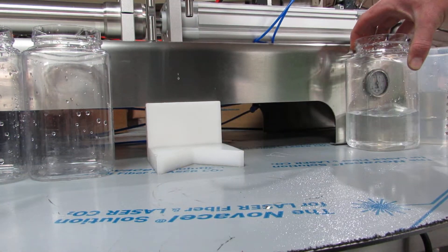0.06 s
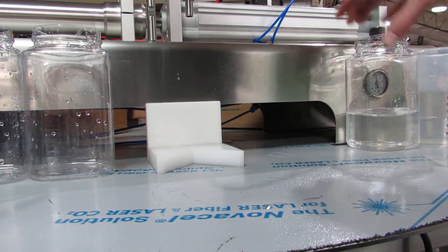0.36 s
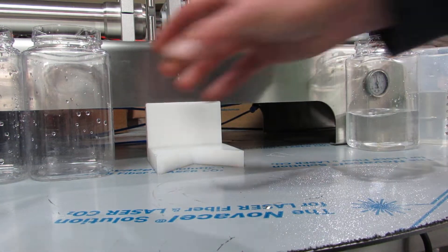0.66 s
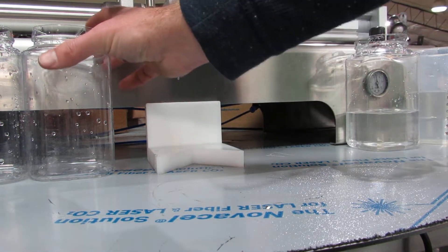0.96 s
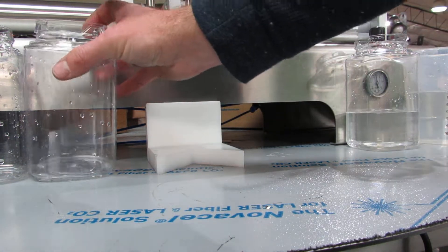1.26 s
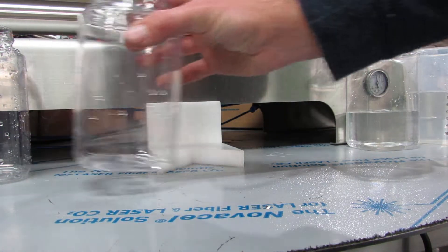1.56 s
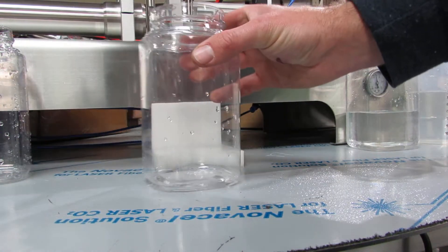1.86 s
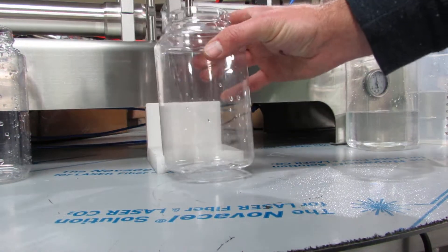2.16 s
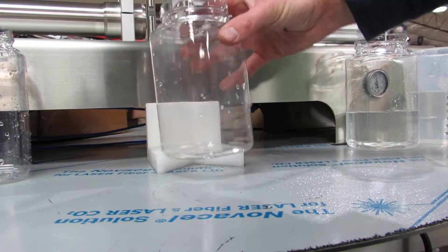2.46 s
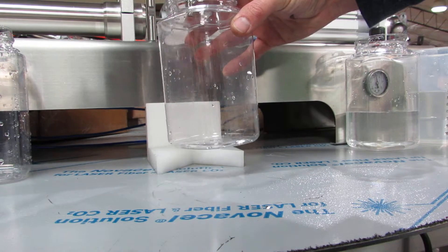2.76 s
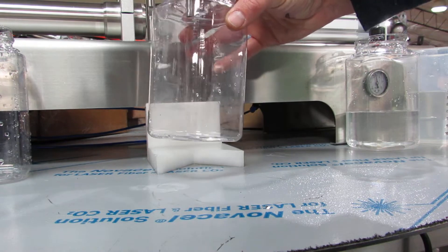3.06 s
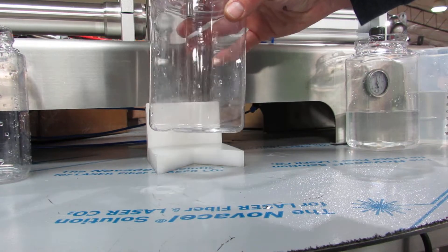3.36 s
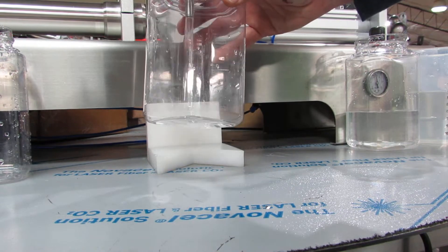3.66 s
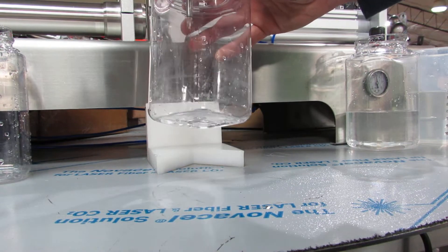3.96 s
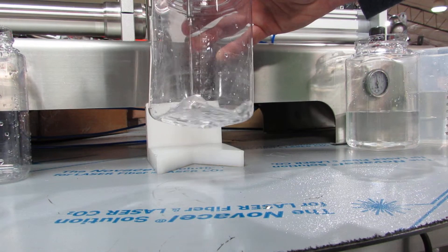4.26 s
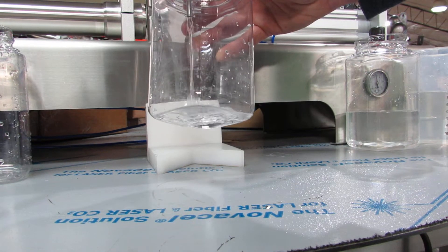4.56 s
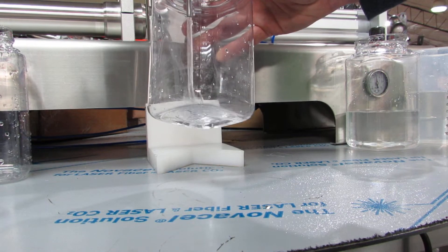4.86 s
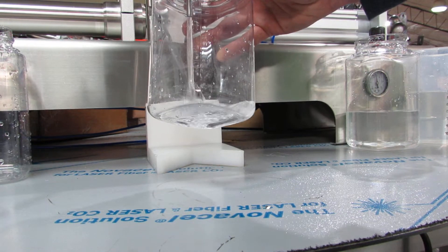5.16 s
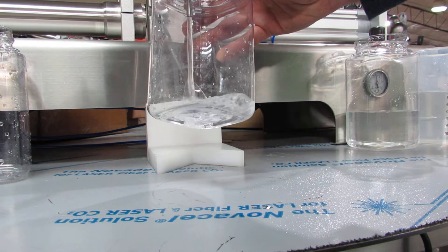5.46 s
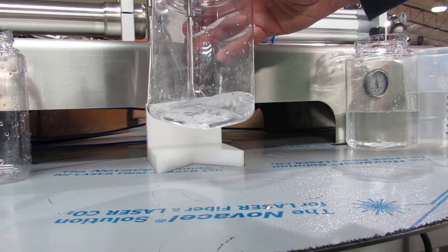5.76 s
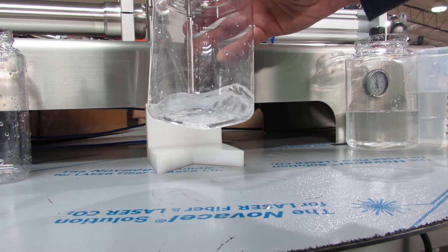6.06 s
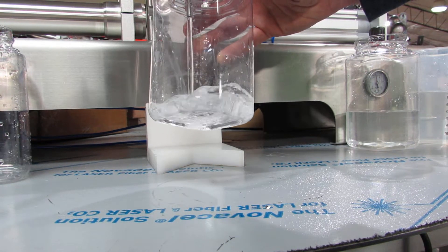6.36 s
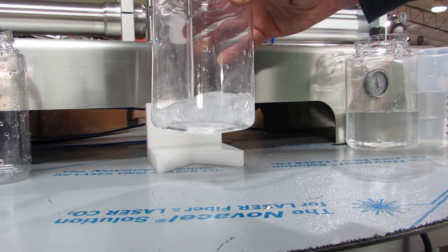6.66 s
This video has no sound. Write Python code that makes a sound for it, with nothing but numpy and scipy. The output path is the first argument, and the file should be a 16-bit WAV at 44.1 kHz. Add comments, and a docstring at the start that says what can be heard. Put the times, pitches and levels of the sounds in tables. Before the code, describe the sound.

Pneumatic hiss and hollow plastic knocks, then a sharp vent and thump as water drums and gurgles into a plastic jar.

```python
"""Air-driven piston filler in a workshop.

Air hisses through a throttle as the piston draws back; a hand knocks an empty plastic jar into place.
A valve vents, the nozzle bangs open and the piston pushes: water drums on the jar's bottom, then
splashes and gurgles in it. A second valve puffs half-way through the push. The room rumbles."""
import sys
import numpy as np
from scipy import signal
from scipy.fft import rfft, irfft
from scipy.io import wavfile

SR = 44100
rng = np.random.default_rng(int(sys.argv[2]) if len(sys.argv) > 2 else 0)


def waveform_to_disk(signal):
    """Save audio, clipped to [-1, 1], as 16-bit WAV at the path in sys.argv[1]."""
    frames = np.transpose(np.atleast_2d(signal))
    scaled = np.clip(frames, -1, 1) * 32767
    samples = np.round(scaled).astype(np.int16)
    wavfile.write(sys.argv[1], SR, samples)


N = 304290
TIME, FREQ = np.arange(N) / SR, np.arange(N // 2 + 1) * SR / N
JET_S = 3.42   # water reaches the jar

# left-right likeness of hiss and splash; the 2-3 kHz band sounds fully centred: freq_hz, correlation
HISS_LIKENESS = [(300, 0.88), (1200, 0.95), (2000, 1), (3000, 1), (3900, 0.99), (7500, 0.72), (10000, 0.75),
                 (14000, .66)]


def draw_hiss(gain_db=3):
    """Air whistles out through a throttle as the piston draws back; the jar moves in and shades it."""
    # turbulence: freq_hz, level_db
    spectrum = [(450, -12), (850, 0.5), (1300, -2.5), (1600, 7), (2250, -7.5), (2750, -7.5), (3600, -3),
                (5100, 1), (5900, -2.5), (7400, 0.5), (8400, -15.5), (9500, -9), (10500, -19.5),
                (15000, -20.5)]
    # throttle resonances: freq_hz, width_hz, gain_db
    peaks = [(1152, 45, 11), (1310, 45, 11), (1548, 14, 8), (1734, 12, 12), (2560, 5.9, 17),
             (2960, 28, 8.5), (3350, 31, 11.5), (3640, 14, 9), (4116, 10, 12), (7030, 70, 1)]
    hiss = air(spectrum, HISS_LIKENESS, peaks, ripple_db=2, ripple_hz=30) + from_db(-11) * whistle()
    flow = stroke(start_s=-.05, end_s=2.635, first_db=-39, steady_db=-45.7, settle_s=0.96)
    shading = from_db(-4 * ramp(start_s=1.7, length_s=0.057))
    return from_db(gain_db) * flow * shading * hiss


def push_hiss(gain_db=2.5):
    """Air escapes through a second throttle as the piston pushes; a faint wisp comes first."""
    # turbulence: freq_hz, level_db
    spectrum = [(450, -20.5), (850, 1), (1250, -2.5), (1600, 0.5), (2000, -2), (2400, -8), (3400, -15.5),
                (4300, -4.5), (5300, -9), (5850, -12), (7500, -2.5), (8500, -9), (10400, -16.5),
                (15000, -15.5)]
    # throttle resonances: freq_hz, width_hz, gain_db
    peaks = [(1129, 5.7, 15), (1534, 56, 6), (1634, 14, 13.5), (1794, 11.5, 15), (2160, 18, -26),
             (3102, 30, 19), (3497, 140, 13.5), (3944, 29, 16.5), (4680, 15, 15), (4930, 57, 9.5),
             (5216, 69, 13.5), (5480, 32, 12.5), (6330, 190, 12.5), (6830, 19, 2), (7100, 38, -5),
             (7025, 49, 12), (7577, 83, 13)]
    hiss = air(spectrum, HISS_LIKENESS, peaks, ripple_db=1.9, ripple_hz=30)
    flow = stroke(start_s=3.34, end_s=7.0, first_db=-42, steady_db=-36.5, settle_s=0.38)
    wisp = burst(start_s=3, level_db=-46, attack_s=-0.5, hold_s=0.1, fall_db_per_s=83)
    return from_db(gain_db) * (flow + wisp) * hiss


def stroke(start_s, end_s, first_db, steady_db, settle_s, open_s=0.046):
    """Air flow gain: the valve opens, the pressure settles, the valve shuts."""
    unsettled = np.exp(-np.maximum(TIME - start_s, 0) / settle_s)
    valve = burst(start_s, steady_db, open_s, end_s - start_s - open_s, fall_db_per_s=185)
    return valve * from_db((first_db - steady_db) * unsettled)


def whistle(pitch_hz=5015, half_width_hz=86, hop_hz=4480, hop_s=1.32, hop_length_s=.36):
    """Narrow noise on a pitch that hops down and back."""
    hopped = (TIME > hop_s) & (TIME < hop_s + hop_length_s)
    phase = 2 * np.pi * np.cumsum(np.where(hopped, hop_hz, pitch_hz)) / SR
    a, b = cut(rng.standard_normal((2, N)), half_width_hz, "low")
    return rms_one(a * np.cos(phase) + b * np.sin(phase))


def nozzle_valve():
    """The valve vents in bright spurts, with a duller rush through its hose."""
    # spurts: start_s, vent_db, rush_db, attack_s, hold_s, fall_db_per_s
    spurts = [(3.237, -33.5, -31, 0.046, .035, 220), (3.303, -15.5, -42, 0.0053, 0.012, 192),
              (3.357, -27, -30, 0.044, .012, 328), (3.45, -46, -37.5, 0.05, 0.0056, 377)]
    # vent turbulence: freq_hz, level_db
    vent_spectrum = [(450, -28), (900, -32), (1700, 3), (2600, -8), (4000, -1), (4600, -1), (6500, 2),
                     (8500, 3.5), (12200, 3.5), (15000, -1.5)]
    # hose turbulence: freq_hz, level_db
    rush_spectrum = [(450, -8.5), (800, -6), (1150, 2), (2000, -4.5), (2800, -3.5), (3500, -16),
                     (8000, -35)]
    vent_flow = sum(burst(s, db, *shape) for s, db, _, *shape in spurts)
    rush_flow = sum(burst(s, db, *shape) for s, _, db, *shape in spurts)
    peaks = [(4050, 63, 6.9), (6350, 120, 1.9)]   # freq_hz, width_hz, gain_db
    vent = vent_flow * air(vent_spectrum, HISS_LIKENESS, peaks, ripple_db=3.5)
    return vent + rush_flow * air(rush_spectrum, HISS_LIKENESS, ripple_db=3.5)


def second_valve():
    """Two leaks, then a puff that dies as the pressure falls."""
    # air bursts: start_s, level_db, attack_s, hold_s, fall_db_per_s
    puffs = [(2.498, -52, .012, .004, 100), (4.875, -42, .02, .008, 300), (4.927, -16.5, 0.0067, 0.05, 117)]
    # turbulence: freq_hz, level_db
    spectrum = [(1200, -29), (2200, -21), (3300, -24), (5500, -15.5), (7200, -15), (8000, -4.5),
                (8550, -3.5), (9700, -5.5), (10200, -9), (12000, -10.5), (15000, -20)]
    peaks = [(8540, 45, 5.9), (9100, 20, 2.4), (8700, 35, 3)]   # freq_hz, width_hz, gain_db
    flow = sum(burst(*puff) for puff in puffs)
    return flow * air(spectrum, HISS_LIKENESS, peaks, ripple_db=3, ripple_hz=25.45)


def cylinders():
    """Pistons hit their stops and thump the frame; the small one lacks bass."""
    # impacts: start_s, level_db, low_cut_hz, t60_scale
    stops = [(3.305, -0.5, 60, 0.6), (4.9306, -15, 300, 0.16)]
    # frame modes: freq_hz, level_db, t60_s
    frame = [(129, -0.5, 0.051), (171, -7, 0.14), (438, -2, 0.18), (475, -3, 0.019), (930, 2, 0.018),
             (1095, -17.5, 0.064), (1854, -4.5, 0.049), (1900, -6, 0.02)]
    out = np.zeros(N)
    for start_s, level_db, low_cut_hz, t60_scale in stops:
        add(out, start_s, from_db(level_db) * cut(strike(frame, t60_scale), low_cut_hz, "high"))
    return out


def handling(gap_s=.0118):
    """A hand knocks the jar, the hardest knock rebounds, the nozzle ticks on the wall."""
    # hand on jar: start_s, bottom_db, pitch_hz, wall_db, t60_scale
    knocks = [(.002, -25.5, 456, -35, 1.6), (1.094, -34.5, 252, -60, .6), (1.351, -21, 310, -27, 0.98),
              (1.724, -4, 346, -2.5, 0.7), (1.959, -31.5, 344, -31, 1.1), (2.059, -10.5, 296, -27, .73),
              (2.642, -24, 257, -39, 1.04)]
    # nozzle on wall: start_s, wall_db
    ticks = [(2.511, -28.5), (3.493, -27), (3.665, -26), (3.735, -16)]
    hardest_s = max(knocks, key=lambda knock: knock[1])[0]
    # columns as in knocks; the bottom gets weaker and higher, each gap doubles
    rebounds = [(hardest_s + gap_s * (2 ** (k + 1) - 1), -16 - 4.5 * k, 149 + 40.3 * k, -27, 0.8)
                for k in range(3)]
    tick_blows = [(s, None, None, db, 1.4) for s, db in ticks]
    return (jar(knocks, tilt_db_per_oct=0.5) + jar(rebounds, tilt_db_per_oct=-2)
            + jar(tick_blows, tilt_db_per_oct=13.5, crack_db=0.5, crack_hz=9100))


def filling_blows(plop_hz=492):
    """Water drums on the jar's bottom, then the jar is bumped a few times; later the water plops."""
    # drumming, then bumps: start_s, bottom_db, pitch_hz, t60_scale
    thuds = [(3.417, -23, 236, 1.9), (3.459, -20.5, 208, 1.9), (3.493, -16.5, 200, 0.52),
             (3.509, -22.5, 186, 0.99), (3.539, -19.5, 270, 0.81), (3.707, -16.5, 520, 0.88),
             (3.735, -19, 520, 0.77), (3.829, -15.5, 348, 0.86), (3.949, -14, 313, 0.56)]
    # rising water: start_s, wall_db
    plops = [(5.108, -26.5), (5.372, -29.5), (5.519, -24.5), (5.756, -21), (6.432, -21), (6.651, -24),
             (6.752, -22.5)]
    thud_blows = [(s, db, hz, db - 13.5, t60_scale) for s, db, hz, t60_scale in thuds]
    plop_blows = [(s, db - 10.5, plop_hz, db, 1.37) for s, db in plops]
    return (jar(thud_blows, tilt_db_per_oct=15, reach_oct=0.7, crack_db=-1, crack_hz=6500)
            + jar(plop_blows, tilt_db_per_oct=1.5, reach_oct=0.82, crack_db=-8))


def jar(blows, tilt_db_per_oct, reach_oct=0.83, crack_db=-10, crack_hz=5000, crack_s=0.0018):
    """Blows ring the walls with a crack; those with a pitch also flex the bottom around it."""
    # flexing bottom modes: freq_hz, level_db, t60_s
    bottom = [(141.4, -11.5, 0.36), (193.3, 0.5, 0.35), (221, -6.5, 0.34), (255, -11.5, 0.33),
              (296.3, 3.5, 0.16), (368, 1, 0.073), (401.3, -8, 0.15), (397, 5, 0.087), (464, -12, 0.24),
              (530, 3.5, 0.069), (596, -9.5, 0.28)]
    # stiff wall modes: freq_hz, level_db, t60_s
    walls = [(658, 2, 0.04), (887, -2, 0.014), (1070, -9, 0.027), (1110, -7, 0.1), (1325, 5.5, 0.055),
             (1410, -14, 0.37), (1590, 6, 0.041), (1870, 2, 0.034), (2100, -21, 0.023), (2167, -1.5, 0.056),
             (2450, -9, 0.056), (2685, -14.5, 0.06), (3350, -8, 0.024), (4100, -26.5, 0.05)]
    tilted = [(hz, db + tilt_db_per_oct * np.log2(hz / walls[0][0]), t60) for hz, db, t60 in walls]
    out, t = np.zeros(N), TIME[:SR // 3]
    for start_s, bottom_db, pitch_hz, wall_db, t60_scale in blows:
        if pitch_hz:
            span_oct = reach_oct * from_db(0.45 * (bottom_db + 14))   # harder blows reach more modes
            reached = [(hz, db - 10 * np.log10(1 + (2 * np.log2(hz / pitch_hz) / span_oct) ** 4), t60)
                       for hz, db, t60 in bottom]
            add(out, start_s, from_db(bottom_db) * strike(reached, t60_scale))
        crack = cut(rng.standard_normal(len(t)) * np.exp(-t / crack_s), crack_hz, "low")
        add(out, start_s, from_db(wall_db) * (strike(tilted, t60_scale) + from_db(crack_db) * crack))
    return cut(out, 117, "high")   # a small body radiates little bass


def splashing():
    """The jet sprays the inside of the jar and rings hollow in the shallow water."""
    # wet jar resonances: freq_hz, width_hz, level_db
    wet_jar = [(310, 230, -6), (455, 64, 3), (877, 66, -11.5), (1395, 280, -3.5), (1550, 290, -1),
               (2050, 190, -7.5), (2200, 110, -3.5), (2680, 61, -3.5), (3180, 190, -6), (4560, 1100, -22),
               (10200, 4000, -20)]
    # shallow water resonances: freq_hz, width_hz, level_db
    hollow = [(1372, 44, -1.5), (1470, 70, -1.5), (2570, 120, -8.5)]
    spray = from_db(-2) * stirring() * droplets(wet_jar, rate_per_s=600, spread_db=3)
    shallow = burst(start_s=5, level_db=-37.5, attack_s=0, hold_s=.28, fall_db_per_s=23.5)
    return spray + shallow * droplets(hollow, rate_per_s=450, spread_db=-0.5)


def droplets(modes, rate_per_s, spread_db):
    """Drops of uneven size tick into resonances; unit power."""
    sizes = from_db(spread_db * np.minimum(rng.exponential(1, (2, N)), 4)) * rng.choice([-1, 1], (2, N))
    drops = sizes * (rng.random((2, N)) < rate_per_s / SR)
    body = sum((-1) ** k * from_db(db) * resonance(hz, width) for k, (hz, width, db) in enumerate(modes))
    mid, side = rfft(drops) * body
    return stereo(mid, side, HISS_LIKENESS)


def gurgle(count=420, decay_cycles=9, pitch_spread=0.049, rise=0.0062, spread_db=1.5, scatter_s=0.043):
    """Bubbles dragged under by the jet ring briefly, rising in pitch as they near the surface."""
    # bubble sizes: pitch_hz, level_db
    bubbles = [(290, -1.5), (500, 0.5), (1440, 9), (1580, -13), (2680, 2)]
    out, t = np.zeros(N), TIME[:SR // 10]
    times_s = np.linspace(JET_S, TIME[-1], count)
    for s, (late, detune, strength) in zip(times_s, rng.standard_normal((count, 3))):
        hz, db = bubbles[rng.integers(len(bubbles))]
        hz = hz * np.exp(pitch_spread * detune)
        age = t * hz / decay_cycles
        ping = np.sin(2 * np.pi * hz * t * (1 + rise * age)) * np.exp(-age)
        add(out, min(s + scatter_s * late, TIME[-1]), from_db(db + 1 + spread_db * strength) * ping)
    return out * stirring()


def stirring():
    """How hard the jet stirs the water, as a gain."""
    # splash strength: time_s, level_db
    strength = [(4.03, -57.5), (4.8, -47.5), (5.07, -46), (6.22, -46.5), (6.44, -43.5), (6.62, -42),
                (6.9, -40.5)]
    return ramp(JET_S, length_s=0.13) * from_db(3 + np.interp(TIME, *np.transpose(strength)))


def reverb(x, t60_s=0.09, cutoff_hz=3500, width=0.28):
    """The workshop's dull diffuse tail, partly shared by both channels."""
    decay = np.exp(-np.log(1000) * TIME[:SR] / t60_s)
    mid, side = cut(rng.standard_normal((2, SR)) * decay, cutoff_hz, "low")
    tail = mid + width * side * [[1], [-1]]
    return signal.fftconvolve(x[None], tail / np.sqrt(np.sum(tail ** 2) / 2), axes=1)[:, :N]


def rumble():
    """Steady low noise of the workshop."""
    # room noise: freq_hz, level_db
    spectrum = [(20, -18.5), (45, -9), (75, -4), (140, -6.5), (300, -8.5), (540, -9), (750, -22),
                (1100, -17.5), (2100, -27), (2900, -35), (5200, -40), (7000, -34.5), (8500, -40.5),
                (15000, -46.5)]
    # left-right likeness: freq_hz, correlation
    likeness = [(30, 0.33), (70, 0.12), (200, 0.25), (500, 0.38), (1500, 0.89), (8000, 0.64)]
    return air(spectrum, likeness)


def air(spectrum, likeness, peaks=(), ripple_db=0, ripple_hz=60):
    """Turbulent noise lifted by resonances; sheet-metal reflections ripple its spectrum."""
    lift = sum(from_db(db) ** 2 * abs(resonance(hz, width)) ** 2 for hz, width, db in peaks)
    gain = from_db(over_hz(spectrum)) * np.sqrt(1 + lift)
    ripple = np.interp(FREQ / ripple_hz, np.arange(2000), rng.standard_normal(2000))
    mid, side = rfft(rng.standard_normal((2, N))) * gain * from_db(ripple_db * ripple)
    return stereo(mid, side, likeness)


def strike(modes, t60_scale, scatter_db=1):
    """Decaying modes, each struck with its own strength; peak 1."""
    hz, db, t60 = np.transpose(modes)[:, :, None]
    t = TIME[:SR // 3]
    sign = (-1) ** (np.arange(len(hz))[:, None] // 2)   # opposed pairs: the ring swells for a few ms
    gain = sign * from_db(db + scatter_db * rng.standard_normal(hz.shape))
    decay = np.exp(-np.log(1000) * t / (t60 * t60_scale))
    out = np.sum(gain * np.sin(2 * np.pi * hz * t) * decay, axis=0)
    return out / np.max(abs(out))


def burst(start_s, level_db, attack_s, hold_s, fall_db_per_s):
    """Gain that swells, holds and dies away; a negative attack starts at once and advances the fall."""
    falling_s = np.maximum(TIME - start_s - attack_s - hold_s, 0)
    return ramp(start_s, attack_s) ** 2 * from_db(level_db - fall_db_per_s * falling_s)


def ramp(start_s, length_s):
    """Linear rise from 0 to 1."""
    return np.clip((TIME - start_s) / max(length_s, 1e-4), 0, 1)


def stereo(mid, side, likeness):
    """Two unrelated spectra to left and right signals; unit power."""
    alike = np.clip(over_hz(likeness), -1, 1)
    return rms_one(irfft(np.sqrt(1 + alike) * mid + np.sqrt(1 - alike) * side * [[1], [-1]], N))


def resonance(hz, width_hz):
    """Band-pass response, peak 1."""
    return 1j * FREQ * width_hz / (hz ** 2 - FREQ ** 2 + 1j * FREQ * width_hz)


def cut(x, hz, kind):
    """Second-order high- or low-pass."""
    return signal.sosfilt(signal.butter(2, hz, kind, fs=SR, output="sos"), x)


def over_hz(points):
    """Table interpolated over log frequency."""
    hz, value = np.transpose(points)
    return np.interp(np.log(FREQ + 1), np.log(hz), value)


def add(track, start_s, sound):
    """Mix a sound in at its time."""
    at = max(round(start_s * SR), 0)
    track[at:at + len(sound)] += sound[:N - at]


def from_db(db):
    """Decibels to gain."""
    return 10 ** (np.asarray(db) / 20)


def rms_one(x):
    """Scale to unit power."""
    return x / np.sqrt(np.mean(x ** 2) + 1e-20)


def scene():
    """Machine and jar close by, over the workshop's rumble."""
    blows = handling() + filling_blows() + cylinders()
    flows = draw_hiss() + push_hiss() + nozzle_valve() + second_valve() + splashing() + gurgle()
    room = from_db(-43) * rumble() + from_db(-16) * reverb(blows)
    return flows * from_db([[.3], [-.3]]) + blows + room


def record(dry, cutoff_hz=15100):
    """Two slightly unequal microphones with a deep low-mid notch; peaks clipped, top cut."""
    # housing shade: freq_hz, left_minus_right_db
    imbalance = [(60, -1.3), (200, 0.6), (370, -1.8), (520, -0.5), (750, 1.5), (1300, 0.6), (2400, -0.5),
                 (8000, 0.1)]
    shade = from_db(over_hz(imbalance) * [[.5], [-.5]])
    notch = 1 - 0.8 * resonance(hz=678, width_hz=192)
    heard = np.clip(irfft(rfft(dry) * notch * shade, N), -1, 1)
    return signal.sosfilt(signal.ellip(12, .1, 80, cutoff_hz, fs=SR, output="sos"), heard)


dry = scene()
out = record(dry)
waveform_to_disk(out)
```